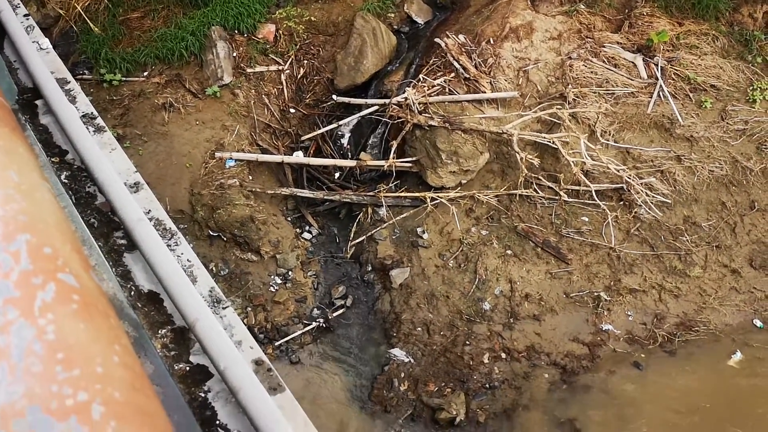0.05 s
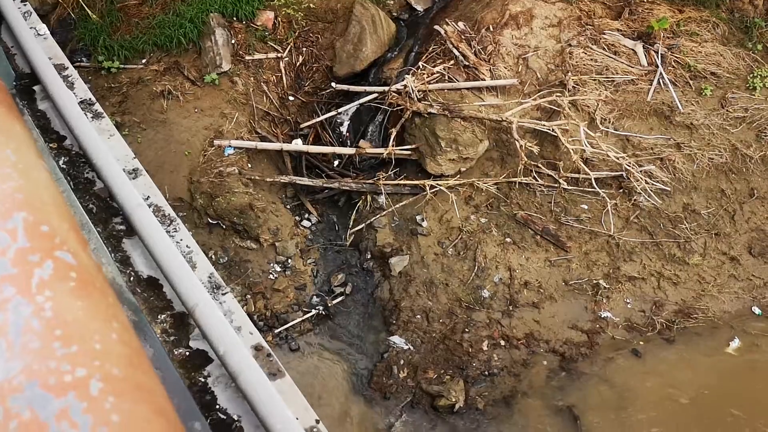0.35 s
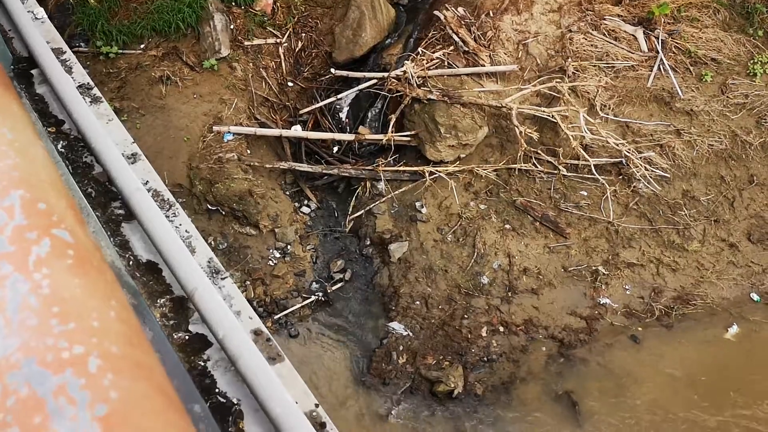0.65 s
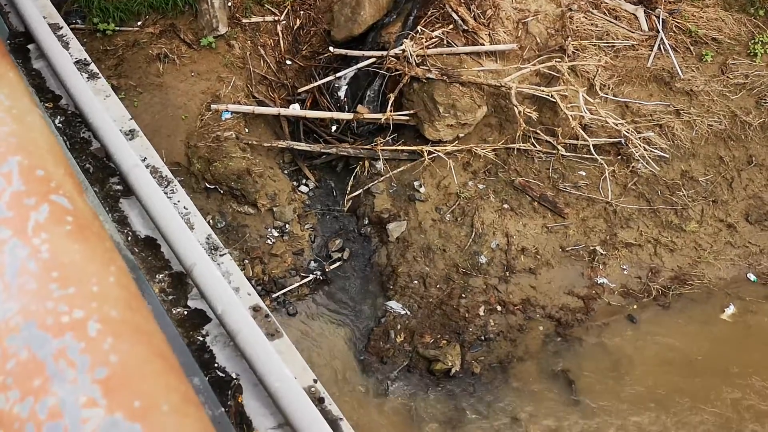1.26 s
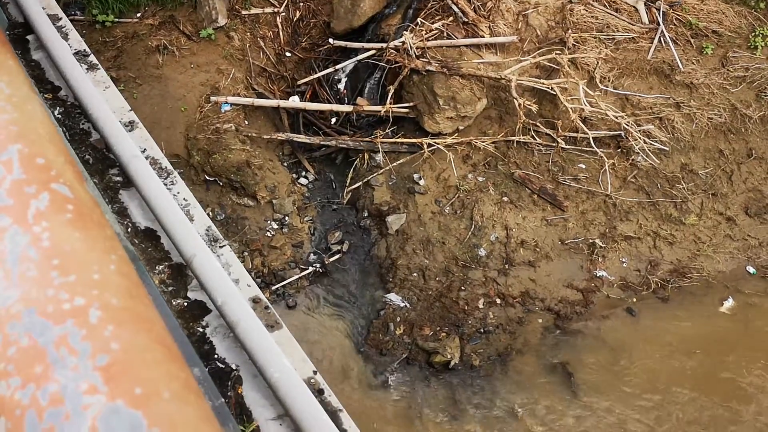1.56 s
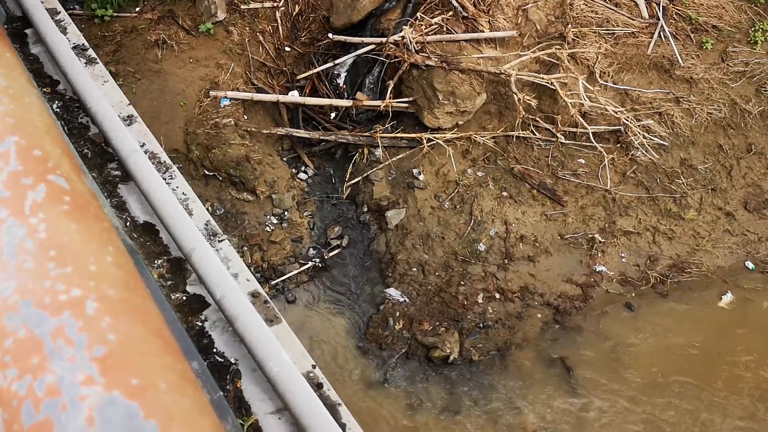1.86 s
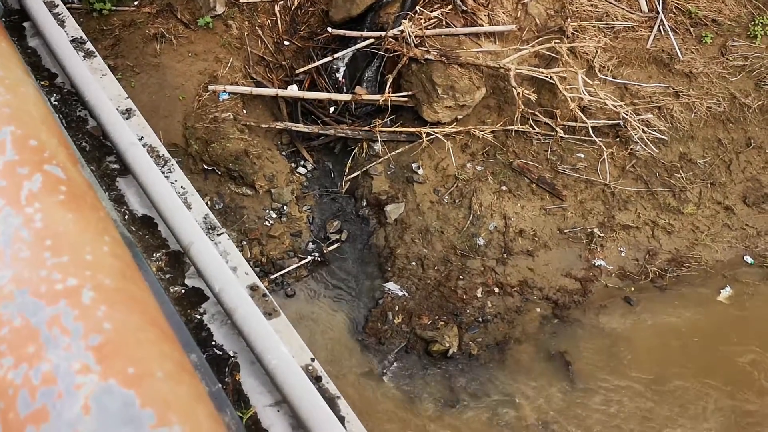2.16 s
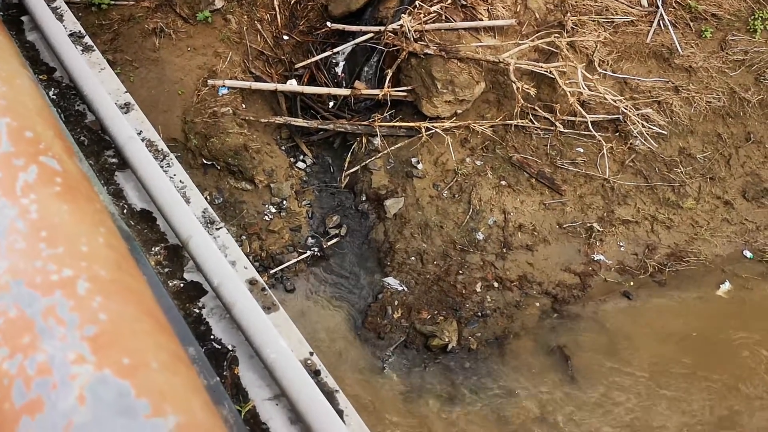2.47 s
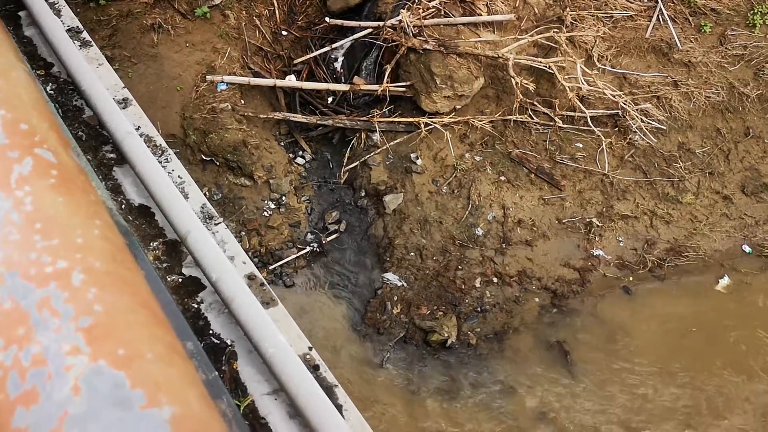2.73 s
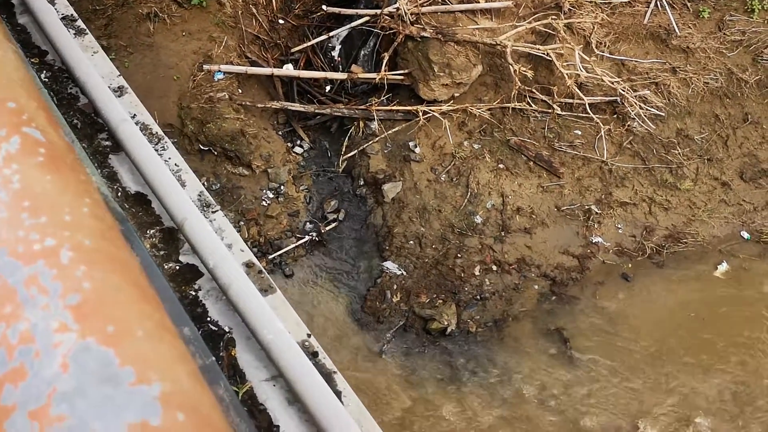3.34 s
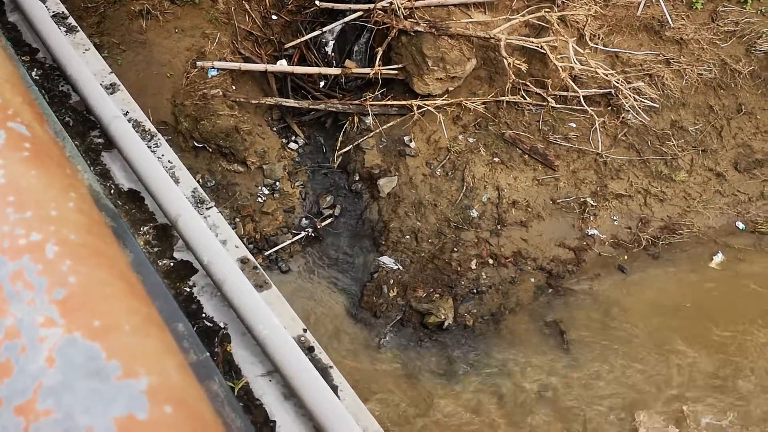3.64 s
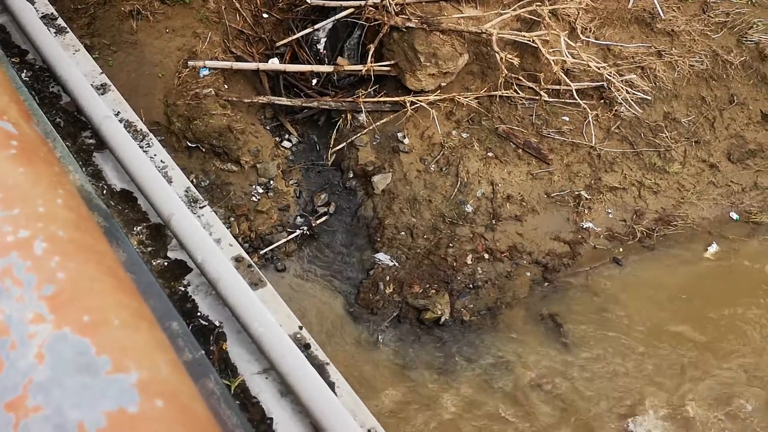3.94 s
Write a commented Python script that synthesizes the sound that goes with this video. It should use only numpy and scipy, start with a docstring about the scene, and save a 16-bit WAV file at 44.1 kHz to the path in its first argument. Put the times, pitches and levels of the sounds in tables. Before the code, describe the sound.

A small outfall pours and gurgles into a river while road traffic rumbles low.

```python
"""From a road bridge, two closely spaced microphones hear the bass alike and the water wide.
From the start a small outfall rushes into the river below, and engines beat over the traffic's rumble.
A sharp splash comes at 0.6 s; around 1.4 s the water gurgles and tyres swell on the left.
The deepest engine fades away. Just after 3 s tyres swell on the left again and more gurgles follow,
while the nearest engine slows and grows louder."""
import sys
import numpy as np
from scipy import signal
from scipy.fft import rfft, irfft
from scipy.io import wavfile
from scipy.ndimage import uniform_filter1d

SR = 44100
rng = np.random.default_rng(int(sys.argv[2]) if len(sys.argv) > 2 else 0)


def file_out(sig):
    """Save sig as 16-bit WAV at sys.argv[1]."""
    # one column per channel
    cols = np.atleast_2d(sig).T
    # limit, then scale
    lim = np.clip(cols, -1, 1)
    pcm = np.round(lim * 32767).astype(np.int16)
    wavfile.write(sys.argv[1], SR, pcm)


N = 176400
TIME = np.arange(N) / SR
FREQS = np.fft.rfftfreq(N, 1 / SR)


# The outfall from the bridge: f/Hz, relative level/dB, left minus right/dB
WATER_SPECTRUM = [(402, -2, 1.0), (520, -2.5, 3), (700, -4.5, 6), (960, -1, 3), (1070, -3.5, 0),
                  (1360, -4, -1.2), (1594, -2, -4), (1680, 2, -1.5), (2040, 1, 2.7), (2493, -4, 1),
                  (3000, -11.5, 3.5), (3410, -16, 5), (4350, -23.5, -1.5), (5000, -20, 1.5),
                  (5630, -20, -11), (6300, -26.5, 8), (7560, -20, 8.1), (9100, -27.5, 8), (10100, -35, -3),
                  (11100, -32.5, -12), (13000, -36.9, -9), (15000, -46, -1.4)]
# Its colour shifts as the microphones turn: f/Hz, left/(dB/s), right/(dB/s)
MIC_TURN = [(700, 0, 0), (1140, 0, -0.4), (1380, 0, 1.1), (1640, -2.3, 0.5), (2050, 0, -0.7),
            (2700, -0.2, -0.3), (3500, -1.1, -0.9), (4400, -0.4, -1.3), (5600, 0, -.2), (9000, 0, 0.5)]
# Body and spray of the rush, each before its gain: t/s, level/dB
BODY_LEVEL = [(0, -37.5), (.58, -38), (1.18, -39), (1.37, -36.5), (1.6, -37.5), (1.85, -38), (2.05, -39),
              (2.35, -39), (2.5, -37.5), (2.62, -39), (2.9, -39), (3.15, -41.5), (3.48, -39), (3.6, -39.5),
              (3.92, -40), (4, -38.5)]
SPRAY_LEVEL = [(0, -51), (.65, -52), (1.15, -52.5), (1.45, -50), (1.56, -51.5), (2.15, -53), (2.53, -52),
               (2.9, -53), (3.12, -55), (3.25, -52.5), (3.66, -54.5), (4, -54.5)]

def outfall(body_gain_db=6, spray_gain_db=1, spray_above_hz=4960):
    """Water rushes into the river below: a churning body and finer spray, each surging a little."""
    noise = stereo_noise(WATER_SPECTRUM, MIC_TURN, patchy_db=1.13, flicker_db=0.24, size=1024)
    spray = filtered(noise, 1 / (1 + (spray_above_hz / (FREQS + 1)) ** 8))
    body = amp(body_gain_db + curves(BODY_LEVEL)[0]) * (noise - spray)
    return body + amp(spray_gain_db + curves(SPRAY_LEVEL)[0]) * unit(spray)


# At the outfall: t/s, level/dB, f/Hz, width/Hz, rise and fall/s, left minus right/dB
GURGLES = [(1.221, -41, 1000, 160, 0.032, 8), (1.428, -50, 1550, 130, 0.029, -6),
           (1.486, -51, 4780, 250, 0.0092, -1), (1.591, -59, 4680, 150, 0.022, 1),
           (3.47, -54, 3220, 130, 0.017, -7), (3.494, -41.5, 1650, 90, 0.03, 5),
           (3.77, -56, 3220, 130, 0.032, 4), (3.9, -42, 1676, 90, 0.018, -10)]

def gurgles():
    """The outfall gurgles in brief, narrow resonances to either side."""
    return sum(swell(s, db, hz, width, edge, edge, lean) for s, db, hz, width, edge, lean in GURGLES)


# Colour of drops and splashes from the bridge: f/Hz, gain/dB, left minus right/dB
DROP_SPECTRUM = [(1500, 9.5, 21), (2310, 7, -20), (4220, 0, 1), (5500, -8, 10), (7450, 3.5, 3),
                 (10100, -7, -5), (12000, -19, -8), (15000, -24, 0)]
# Single splashes, before that colour: t/s, level/dB
SPLASHES = [(0.637, -29), (1.129, -38), (1.48, -34), (2.394, -37), (2.649, -44), (2.683, -38), (2.904, -37)]

def drops(patter_db=-52, per_s=450, spread_db=3, kinds=24, tick_s=.0013, splash_s=.002):
    """Falling drops hit the river as countless tiny ticks and a few sharper splashes."""
    t = TIME[:1024]
    patter, splashes = np.zeros((2, 2, N))
    for _ in range(kinds):
        hits = rng.random(N) < per_s / kinds / SR
        strength = amp(spread_db * np.minimum(rng.exponential(1, N), 4))
        tick = rng.standard_normal((2, len(t))) * np.exp(-t / tick_s)
        patter += signal.oaconvolve([hits * strength], tick, axes=1)[:, :N]
    for s, db in SPLASHES:
        start = round(s * SR)
        burst = rng.standard_normal((2, len(t))) * np.exp(-t / splash_s)
        splashes[:, start:start + len(t)] += amp(db) * burst
    gain = colour(DROP_SPECTRUM, FREQS)
    return amp(patter_db) * unit(filtered(patter, gain)) + filtered(splashes, gain)


# Engine nearest the microphones: t/s, firing f/Hz
NEAR_FIRING = [(0, 75.25), (.32, 76.8), (.8, 74.13), (1.05, 75.8), (1.5, 74.6), (2.05, 73.01), (2.5, 73.1),
               (3.12, 71), (3.56, 68.4), (4, 65.77)]
# Its two lowest tones: t/s, firing level/dB, octave level/dB
NEAR_LEVELS = [(0, -22.5, -32.5), (.12, -35, -21.5), (.2, -26, -34), (.36, -23.5, -19.5), (.52, -27, -36.5),
               (.8, -23.5, -31.5), (.88, -25, -34), (1.02, -23.5, -26.5), (1.36, -36, -49),
               (1.52, -25, -34), (1.68, -35, -44), (1.78, -30.5, -26.5), (2.04, -22, -38.5),
               (2.36, -23, -36), (2.6, -30.5, -37), (2.9, -27, -33), (3.14, -20, -20.5),
               (3.36, -20.5, -39.5), (3.58, -18.5, -16.5), (3.84, -18, -29), (4, -16, -29.5)]

def near_engine(third_below_db=24):
    """The nearest engine slows, droning at its firing rate and two overtones."""
    hz = curves(NEAR_FIRING)[0]
    firing_db, octave_db = curves(NEAR_LEVELS)
    orders = enumerate([firing_db, octave_db, firing_db - third_below_db], 1)
    return sum(tone(k * hz, db, waver_db=1, waver_hz=17) for k, db in orders)


# Two lower engines on the road: t/s, firing f/Hz, level/dB
SECOND_ENGINE = [(0, 66, -29), (.36, 64.5, -29), (.48, 62.9, -31), (.68, 63.6, -32.5), (.8, 63.6, -39),
                 (1.12, 62.8, -24.5), (1.35, 61.63, -23.5), (1.6, 60.88, -18), (1.72, 60.68, -36),
                 (1.85, 58, -16), (1.98, 57.3, -26), (2.48, 57.5, -30), (2.66, 57.3, -27.5),
                 (2.85, 57.04, -32), (4, 54.5, -43)]
DEEP_ENGINE = [(0, 46.7, -32), (.5, 45.46, -30), (1.25, 42, -33), (2.001, 37.2, -39), (2.6, 32.6, -46),
               (4, 33.08, -60)]

def lower_engines():
    """Two slower firing tones beat against the nearest engine; the deeper fades away."""
    return sum(tone(*curves(table), waver_db=1.15, waver_hz=12) for table in (SECOND_ENGINE, DEEP_ENGINE))


# Engine far from the microphones: t/s, cycle f/Hz, level/dB
FAR_ENGINE = [(0, 37.37, -38), (.6, 36.94, -41.5), (1.8, 36.99, -40.5), (2.3, 37.7, -39.5),
              (3, 39.4, -46.5), (3.6, 40.17, -46), (4, 39.3, -46.5)]
# Its tones: multiple of the cycle rate, relative level/dB
FAR_ORDERS = [(3, -1), (6, -2), (7, -4), (8, -11)]

def far_engine():
    """A distant engine picks up speed, heard as four wavering multiples of its cycle rate."""
    hz, level_db = curves(FAR_ENGINE)
    return sum(tone(k * hz, level_db + db, waver_db=4.5, waver_hz=5.1) for k, db in FAR_ORDERS)


# Tyres left of the microphones: peak t/s, level/dB, f/Hz, width/Hz, rise/s, fall/s
TYRE_SWELLS = [(1.42, -45.5, 863.4, 300, 0.6, 0.37), (3.3, -40, 950, 260, 0.11, 0.12),
               (3.5, -42.5, 830, 249, 0.26, 0.28)]

def tyres():
    """Tyre roar swells on the road and dies away."""
    return sum(swell(*row, lean_db=8) for row in TYRE_SWELLS)


# Traffic from the bridge: f/Hz, relative level/dB, left minus right/dB
RUMBLE_SPECTRUM = [(10, -23, 0), (25, -9, 0), (38.4, -11.5, 1), (57.4, -0.5, 1), (82, 2.5, -2),
                   (113.5, 0, 0), (167, -4, -2), (224, -9, 2.5), (289, -14, -1.5), (353, -23, -3),
                   (480, -36.5, -1), (800, -62.5, 3)]
# The band near 50 Hz recedes while those either side draw near: f/Hz, trend/(dB/s)
RUMBLE_TREND = [(25, 5.5), (42, -1.5), (56, -2), (85, 2.5), (115, 0.96), (200, 0), (300, -1.1), (450, -0.5)]
# The whole rumble: t/s, level/dB
RUMBLE_LEVEL = [(0, -25.5), (.6, -26), (1.2, -27.5), (1.55, -25.5), (2.1, -23.5), (2.6, -27.5),
                (3.1, -23.5), (3.5, -29.5), (4, -26)]

def traffic():
    """The low rumble of traffic rises and falls behind everything."""
    noise = stereo_noise(RUMBLE_SPECTRUM, RUMBLE_TREND, patchy_db=1.5, flicker_db=0, size=4096)
    return amp(curves(RUMBLE_LEVEL)[0]) * noise


# Likeness of the two close microphones: f/Hz, coherence (0-1), left lead/rad
MIC_PAIR = [(20, 0.9, .05), (60, 0.94, 0.068), (105, 1, 0.2), (152, 0.98, 0.41), (278, 0.86, 0.6),
            (380, 0.73, 1.3), (560, 0.64, 2.57), (710, .72, 3.03), (950, 0.41, 2.47), (1160, 0.5, 1.11),
            (1384, 0.43, 3.5), (1560, 0.36, 3.93), (1950, 0.4, 4.64), (2200, 0.07, 3.7), (2470, 0.28, 2),
            (2900, .37, 2.64), (3340, 0.8, 5.2), (4280, 0.18, 9.25), (5240, 0.2, 7.06), (8000, .15, 8.4)]

def stereo_noise(spectrum, trend, patchy_db, flicker_db, size):
    """Noise at both microphones, with drifting patches, a shared flicker and a slow shift of colour."""
    hop, hz = size // 4, np.fft.rfftfreq(size, 1 / SR)
    frames = N // hop + 5
    a, b, c, d, patches = rng.standard_normal((5, frames, len(hz)))
    patches = unit(uniform_filter1d(uniform_filter1d(patches, size=14, axis=0), size=6, axis=1))
    flicker = unit(uniform_filter1d(rng.standard_normal(frames), size=4))[:, None]
    coherence, lead = across(MIC_PAIR, hz)
    left, unrelated = a + 1j * b, c + 1j * d
    right = (coherence * left + np.sqrt(1 - coherence ** 2) * unrelated) * np.exp(-1j * lead)
    from_middle_s = (np.arange(frames) * hop - N / 2) / SR
    trend_db = np.array(across(trend, hz))[:, None] * from_middle_s[:, None]
    gain = colour(spectrum, hz)[:, None] * amp(patchy_db * patches + flicker_db * flicker + trend_db)
    spectra = np.array([left, right]) * gain
    return unit(signal.istft(spectra.transpose(0, 2, 1), nperseg=size, noverlap=size - hop)[1][:, :N])


def tone(hz, db, waver_db, waver_hz):
    """One engine order at both microphones, wavering at random in strength."""
    phase = 2 * np.pi * (np.cumsum(hz) / SR + rng.random())
    lead = across(MIC_PAIR, hz)[1]
    waver = unit(filtered(rng.standard_normal(N), np.exp(-(FREQS / waver_hz) ** 2)))
    return np.sqrt(2) * amp(db + waver_db * waver) * np.sin([phase, phase - lead])


def swell(s, db, hz, width_hz, rise_s, fall_s, lean_db):
    """A resonant band of noise that rises and falls."""
    band = filtered(rng.standard_normal((2, N)), 1 / (1 + ((FREQS - hz) / width_hz) ** 2 / 2) ** 2)
    envelope = np.exp(-((TIME - s) / np.where(TIME < s, rise_s, fall_s)) ** 2 / 2)
    return amp(db + np.array([[lean_db], [-lean_db]]) / 2) * envelope * unit(band)


def amp(db):
    """Decibels to gain."""
    return 10 ** (np.asarray(db) / 20)


def unit(x):
    """Scales to an rms of one."""
    return x / np.sqrt(np.mean(x ** 2) + 1e-20)


def curves(table):
    """Each column of a time table, sample by sample."""
    s, *columns = np.transpose(table)
    return [np.interp(TIME, s, c) for c in columns]


def across(table, hz):
    """Each column of a frequency table, on a log axis."""
    f, *columns = np.transpose(table)
    return [np.interp(np.log(hz + 1), np.log(f), c) for c in columns]


def colour(table, hz):
    """Left and right gains of a spectrum table."""
    db, lean = across(table, hz)
    pair = amp(np.array([lean, -lean]) / 2)
    return amp(db) * pair / np.sqrt((pair ** 2).mean(0))


def filtered(x, gain):
    """Applies a gain per frequency."""
    return irfft(rfft(x) * gain, N)


def scene():
    """Water below the bridge, traffic above."""
    water = outfall() + gurgles() + drops()
    return water + traffic() + tyres() + near_engine() + lower_engines() + far_engine()


def record(dry, edge_hz=15150):
    """The recorder's band limit."""
    lowpass = signal.firwin(511, edge_hz, window=("kaiser", 9), fs=SR)
    return signal.oaconvolve(dry, lowpass[None], "same")


dry = scene()
out = record(dry)
file_out(out)
```